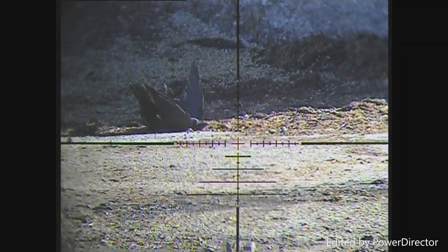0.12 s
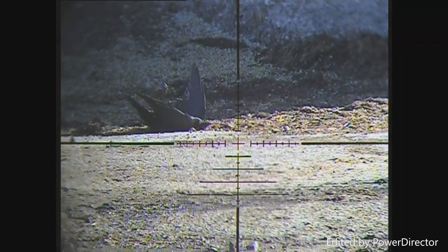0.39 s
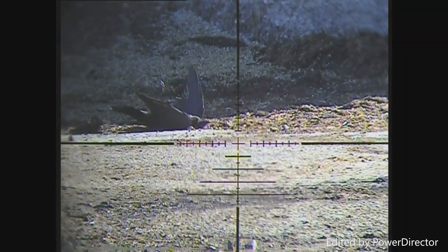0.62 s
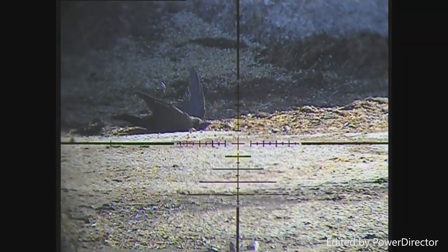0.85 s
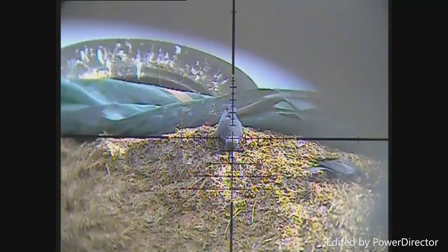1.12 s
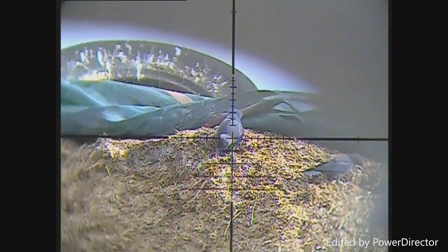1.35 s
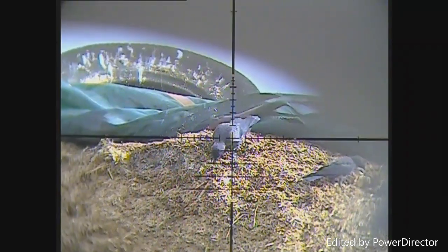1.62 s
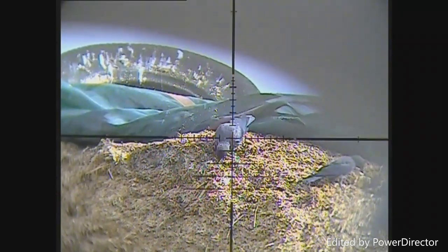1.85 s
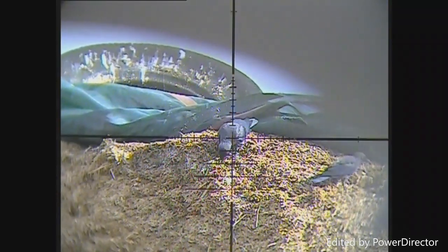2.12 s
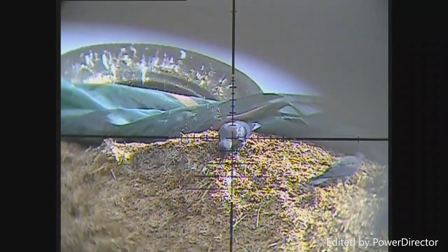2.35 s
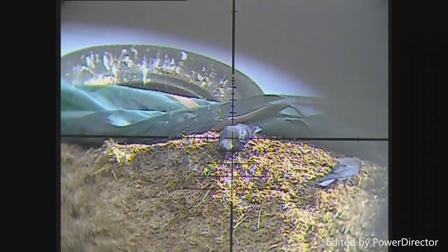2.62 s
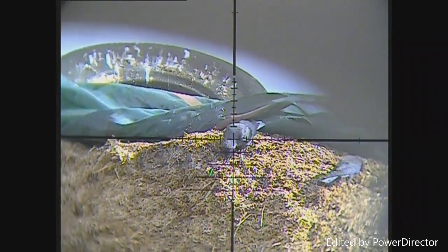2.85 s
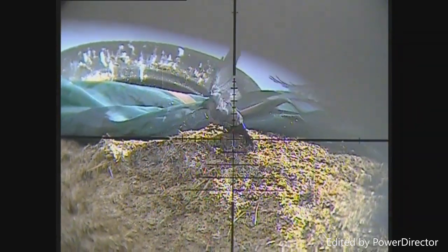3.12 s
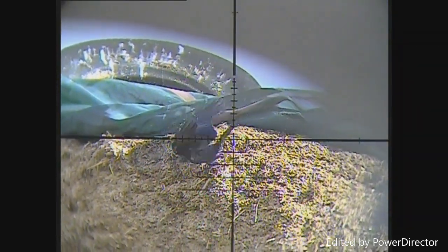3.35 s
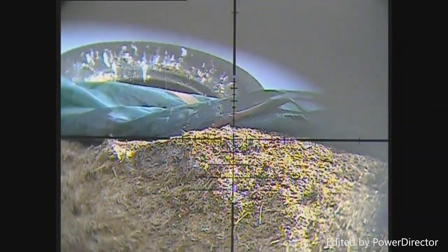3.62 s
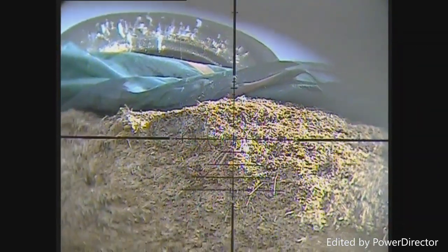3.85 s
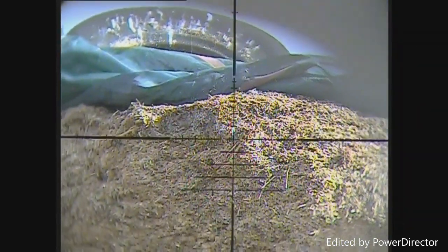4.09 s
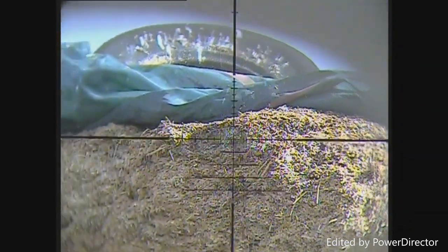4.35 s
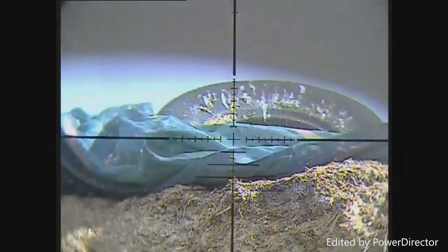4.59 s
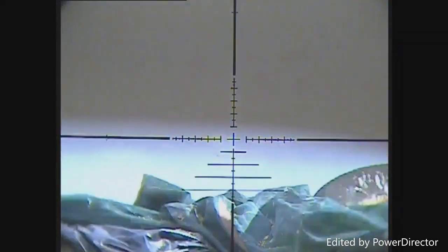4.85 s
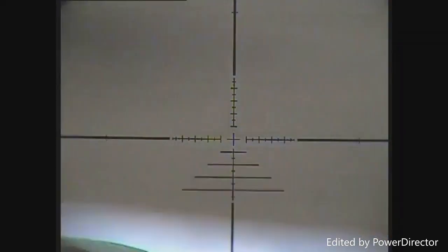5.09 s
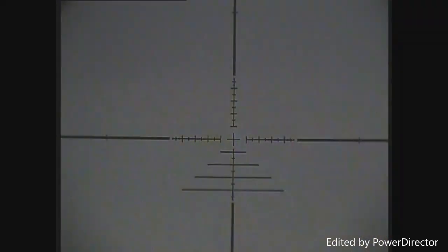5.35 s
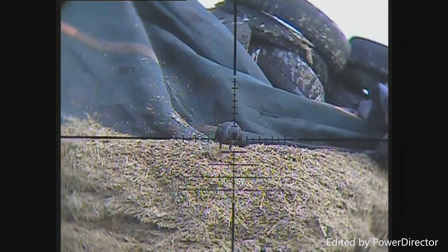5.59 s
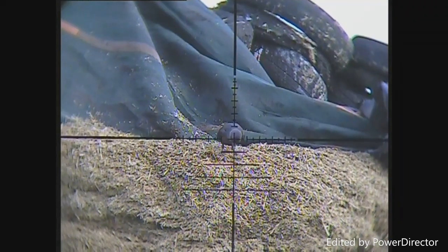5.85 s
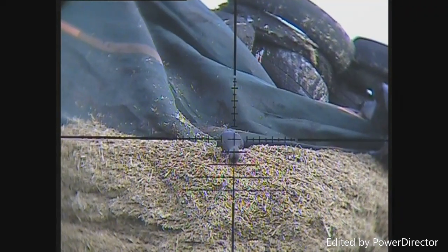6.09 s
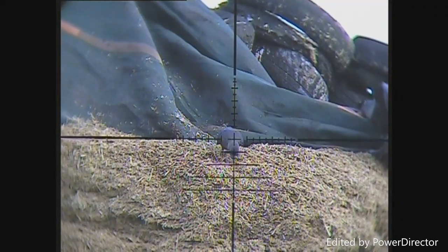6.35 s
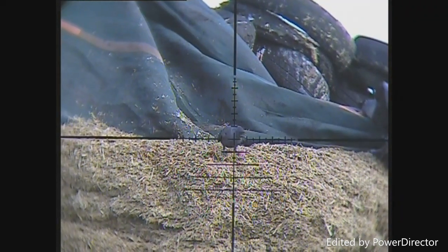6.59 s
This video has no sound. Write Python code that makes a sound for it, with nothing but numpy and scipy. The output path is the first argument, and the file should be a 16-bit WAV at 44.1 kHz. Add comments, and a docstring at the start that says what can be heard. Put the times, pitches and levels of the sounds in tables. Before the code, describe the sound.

Outdoors on a farm, a small camera microphone on an air rifle hears a distant vehicle's low rumble and rising engine tones, with thin sparrow chirps and a button click. After a silent gap, quiet hiss leads to one clipped, cracking shot with metallic ringing and a short yard echo. Bolt knocks and cloth rustle follow, then another click, silence, a brief rattle and quiet hiss.

```python
"""An air rifle with a small camera on its scope, outdoors on a farm, heard in three stretches with silence between.
First a vehicle passes far off, made of coloured noise and gliding tones; a sparrow chirps and a button rings its case.
Then one shot overloads the input: struck modes ring in rifle and air cylinder, a throbbing air column and a noise
crack sound, and the yard echoes in bands of dying noise. The rifle is cocked and shifted with knocks and cloth rustle,
and the button clicks again. Last, after a short rattle, only the quiet yard and the hiss of the circuit remain."""
import sys
import numpy as np
from scipy import signal
from scipy.fft import rfft, irfft, next_fast_len
from scipy.io import wavfile

SR = 44100
rng = np.random.default_rng(int(sys.argv[2]) if len(sys.argv) > 2 else 0)


def ratio(d):
    """dB to gain"""
    e = np.asarray(d, float) / 20
    return 10 ** e


def wav_record(signal):
    """Record a signal, one row per channel, as 16-bit PCM in the file named by sys.argv[1]."""
    frames = np.transpose(np.atleast_2d(signal))
    bounded = np.clip(frames, -1, 1)
    # unit amplitude maps onto the largest positive 16-bit level
    quanta = np.round(bounded * 32767).astype(np.int16)
    wavfile.write(sys.argv[1], SR, quanta)


N = 295911

# Stretches in which the input is live. Each row: start in seconds, stop in seconds.
LIVE_SPANS = [(0, .8350), (1.1184, 5.0850), (5.6184, 6.8)]

# Passing vehicle. Each row: time in seconds, rumble level in dB, tyre roar level in dB.
TRAFFIC = [(0, -38, -61), (.1, -46, -60), (.2, -42.5, -60.5), (.33, -46.5, -59), (.59, -37, -56),
           (.76, -46, -57)]
# Colour of its low rumble. Each row: frequency in Hz, relative density in dB per Hz.
RUMBLE_COLOUR = [(12, -26.5), (20, 3), (68, -1.5), (198, -17), (274, -22), (312, -28.5), (450, -30),
                 (580, -59.5), (990, -120)]
# Colour of its tyre roar. Each row: frequency in Hz, relative density in dB per Hz.
ROAR_COLOUR = [(180, -35), (300, -5), (458, -8), (504, -10.5), (553, -17.5), (760, -4), (1520, -21),
               (2000, -20.5), (3470, -36.5), (4600, -41.5), (5000, -35), (6500, -61), (11000, -120)]
# Rising engine tones. Each row: start in seconds, stop in seconds, first pitch in Hz, last pitch in Hz,
# level at the middle in dB.
ENGINE_HOWLS = [(0, .29, 239.5, 298.4, -56.5), (0.398, 0.591, 314.6, 369, -56), (.58, 0.758, 394, 416, -62)]
# The loudest engine tone as a curve. Each row: time in seconds, pitch in Hz, level in dB.
LOUD_HOWL = [(.42, 216, -61), (.544, 241.5, -57.5), (.66, 273, -44), (.77, 297, -48.5), (.835, 285, -50.5)]
ROAR_HZ, ROAR_SAG_FROM_S, ROAR_SAG_HZ_PER_S = 2110, .2, 380   # the roar's resonance sinks as it passes
DRONE_HZ, DRONE_DB = 498, -68.5
SWELL_DB = 4.5   # a gliding tone is this much weaker at its ends

# Low wind. Each row: time in seconds, level in dB.
GUSTS = [(1.12, -66), (2.0, -66.5), (2.8, -64.5), (3.4, -59.5), (3.9, -62), (4.4, -63), (4.7, -59.5),
         (5.08, -64), (5.62, -68), (6.7, -67)]
# Colour of the wind. Each row: frequency in Hz, relative density in dB per Hz.
WIND_COLOUR = [(8.8, -26), (15, 6), (27, -12.5), (80, -10), (103, -17.5), (235, -22), (262, -23),
               (507, -32), (1200, -43), (1560, -72), (2640, -120)]
# Cloth rustles as the rifle is shifted. Each row: start in seconds, stop in seconds, level in dB.
MOVES = [(3.692, 3.823, -74.5), (4.06, 4.248, -72), (4.544, 5.13, -73)]
# Colour of the cloth. Each row: frequency in Hz, relative density in dB per Hz.
RUSTLE_COLOUR = [(180, -31), (300, -3), (502, 3), (565, -10.5), (725, -8.5), (1460, -18.5), (1980, -11.5),
                 (3480, -21.5), (7000, -24), (9100, -57.5), (15400, -120)]
MOVE_FADE_S, STILL_DB = 0.047, -84
HUM_HZ, HUM_DB = 75.4, -75

# Colour of the hiss shared by both channels. Each row: frequency in Hz, relative density in dB per Hz.
SHARED_HISS_COLOUR = [(350, -33), (600, -2.5), (979, -7.5), (7320, -12.5), (7620, -8), (8050, -3),
                      (8380, -7), (8970, -6.5), (12300, -11.5), (13500, -7.5), (15400, -14.5)]
# Colour of the hiss with opposite sign in the two channels. Each row: frequency in Hz, relative density in dB per Hz.
OPPOSED_HISS_COLOUR = [(12, -26.5), (20, -5.5), (26, -12.5), (33, -41.5), (70, -45.5), (98, -32.5),
                       (119, -49.5), (238, -51.5), (630, -53), (11100, -59), (15400, -69)]
SHARED_HISS_DB, OPPOSED_HISS_DB = -77, -67.5   # rms
# Whine of the camera electronics. Each row: frequency in Hz, level in dB rms.
WHINE = [(7865, -82), (9001, -94.5), (13028, -102), (14002, -100)]
# Constant input offset. Each row: one channel's offset (left, then right) as a share of full scale.
OFFSET = [
    [-.0068],
    [.0059],
]
SETTLE, SETTLE_S = 0.0039, 0.045   # microphone bias as a share of full scale, and its decay time
CUTOFF_HZ = 15800   # stopband edge of the input's top cut

# Sparrow notes. Each row: start in seconds, stop in seconds, first pitch in Hz, last pitch in Hz,
# level at the middle in dB.
CHIRPS = [(0.495, .53, 4630, 4730, -66), (0.516, 0.54, 4680, 5250, -66.5), (0.534, .572, 4720, 4650, -78.5),
          (0.579, .597, 3770, 4320, -67), (.608, 0.629, 4660, 5330, -73), (0.81, .828, 4150, 5150, -75),
          (0.82, .842, 4850, 4980, -69.5)]

# Presses of the camera's stop button. Each row: time in seconds, peak level in dB.
PRESSES = [(0.791, -28.5), (5.05, -30)]
# Modes of the camera case. Each row: frequency in Hz, level in dB, t60 in seconds.
CASE_MODES = [(200, -15.5, 0.068), (530, -10.5, 0.08), (760, -3.5, 0.03), (980, -6.5, 0.034),
              (1720, -9.5, 0.018), (2340, -3, 0.0025), (3030, -12.5, 0.017), (3860, -19, 0.007),
              (5000, -16.5, 0.0062), (6700, -16.5, .015), (9500, -23.5, .006)]
# Rattles of the button letting go. Each row: time in seconds, level in dB rms, t60 in seconds.
RELEASES = [(1.1188, -62.5, 0.05), (5.064, -66.5, 0.11), (5.076, -74, 0.053), (5.6184, -52, 0.057)]
# Colour of that rattle. Each row: frequency in Hz, relative density in dB per Hz.
RATTLE_COLOUR = [(710, -42), (1200, -15), (2440, -4.5), (2730, -10), (3220, 0.5), (4710, -13), (8730, -5),
                 (10400, -15), (14000, -14)]

SHOT_S = 2.8258
# Modes of the rifle's action. Each row: frequency in Hz, level in dB, t60 in seconds.
ACTION_MODES = [(412.1, -13.5, 0.026), (535, -7, 0.029), (696, -0.5, .025), (843, -6, 0.025),
                (1129, -16.5, 0.011), (1420, -21, .015), (1670, -19, 0.065), (2080, -25, 0.028),
                (3180, -25.5, .012), (3790, -24, 0.025), (4400, -25, 0.013), (5800, -27, .01),
                (8500, -30, .008)]
# Modes of the stock. Each row: frequency in Hz, level in dB, t60 in seconds.
STOCK_MODES = [(61.7, -10.5, 0.072), (111, -7, 0.15), (163, -3, 0.082), (225, 1.5, 0.15), (296, -7, .06),
               (357, -9, 0.045)]
# The trigger lets go. Its one row: time in seconds, peak level in dB, contact in ms, share into the stock in dB.
SEAR = (2.8208, -26, .5, -8)
# The hammer chatters on the open valve: gap, first touch, loss per touch, contact, share into the stock.
CHATTER_S, HAMMER_DB, CHATTER_LOSS_DB, HAMMER_MS, HAMMER_STOCK_DB = .0037, -3.5, 1.5, 0.051, -13.5
# The hammer falls back. Each row: time in seconds, peak level in dB, contact in ms.
BOUNCES = [(2.8478, -8.5, .06), (2.8643, -5, .17), (2.8946, -12.5, .17), (2.9030, -19, .16),
           (2.9100, -21.5, .14)]
BOUNCE_STOCK_DB = -25
# Bolt and handling knocks. Each row: time in seconds, peak level in dB, contact in ms, share into the stock in dB,
# change at each rebound in dB.
KNOCKS = [(3.699, -56.5, .05, -0.5, -1.5), (3.834, -52, 0.27, -3.5, -14), (3.8839, -35.5, .09, -17, -8),
          (3.896, -37.5, 0.011, -2, -20), (3.9, -27, .1, -15.5, -5), (3.977, -32, .28, -3, -1),
          (4.227, -54.5, 0.11, -2, 3.5), (4.305, -56, 0.14, -1.5, -3.5), (4.491, -46.5, 0.17, -10.5, -5),
          (4.512, -53, 0.19, -6, 1), (4.531, -41, 0.12, -17, -4), (4.649, -52, 0.27, 2.5, -9),
          (4.684, -55, 0.47, 4, -6), (4.711, -60, 0.44, 3, -3), (4.979, -59.5, 0.39, 5, -10)]
# Two rebounds follow each knock: gap, growth of the contact each time, share by which the gap varies.
REBOUND_S, REBOUND_SOFTER, REBOUND_UNEVEN = .006, 1.46, .25

# Modes of the air cylinder. Each row: frequency in Hz, level in dB, t60 in seconds.
CYLINDER_MODES = [(617, -21, .18), (799.5, -5, 0.083), (1017, -12.5, 0.084), (1116, -6.5, 0.018),
                  (1520, -11, 0.028), (2283, -13, .14), (2400, -22, 0.057)]
# Its long note falls fast, then slowly. Each row: frequency in Hz, level in dB, t60 in seconds.
PING = [(874, -20, .43), (874, -35.5, 2.1)]
# Barrel air column: pitch, height, time the valve is open, fall after it shuts.
BARREL_HZ, BARREL_DB, VALVE_OPEN_S, BARREL_T60_S = 614, 6, .0092, .008
# Colour of the muzzle crack. Each row: frequency in Hz, relative density in dB per Hz.
BLAST_COLOUR = [(710, -34.5), (1200, -3.5), (2350, -12), (3210, -17.5), (3530, -15.5), (9050, -21.5),
                (15400, -38.5)]
BLAST_DB, BLAST_RISE_S, BLAST_T60_S = -6.5, .0008, 0.033
# Colour of the yard's echoes. Each row: frequency in Hz, relative density in dB per Hz.
YARD_COLOUR = [(40, -14), (100, -7), (230, -8.5), (420, -7.5), (700, -7), (1000, -10.5), (1400, -13.5),
               (2200, -5.5), (3300, -13.5), (4700, -10), (5800, -16), (6900, -12.5), (8500, -19.5),
               (11000, -25), (15300, -32)]
# How long the echoes last. Each row: frequency in Hz, t60 in seconds.
YARD_T60 = [(60, 1.5), (150, .9), (400, .8), (1000, .6), (1500, 0.72), (2200, 0.73), (3300, .55),
            (4700, .6), (7000, 0.4), (10000, .4), (14000, 0.27)]
# Far walls swell the echoes again. Each row: delay in seconds, level in dB.
LATE_ECHOES = [(.06, -8), (0.094, -9.5), (.125, -24), (.17, -29), (.215, -12), (.29, -7)]
YARD_DB = -31.5   # echoes at the moment of the shot


def rms_one(x):
    """Scale to rms 1."""
    return x / np.sqrt(np.mean(x ** 2) + 1e-20)


def in_time(rows):
    """Columns of a curve at every sample."""
    s, *columns = np.transpose(rows)
    return [np.interp(np.arange(N) / SR, s, c) for c in columns]


def at_hz(points, hz):
    """Read a spectrum on a log frequency axis."""
    return np.interp(np.log(hz), np.log(np.array(points)[:, 0]), np.array(points)[:, 1])


def since(s):
    """Time since an event (zero before it), and whether it has begun."""
    t = np.arange(N) / SR - s
    return np.maximum(t, 0), t >= 0


def drift(rate):
    """Slow chance: straight lines between random knots of spread 1, rate knots per second."""
    knots = rng.standard_normal(int(N / SR * 60) + 9)
    return np.interp(np.arange(N) / SR * np.clip(rate, .1, 59), np.arange(len(knots)), knots)


def noise(colour, length=N):
    """Noise of the given colour, rms 1."""
    size = next_fast_len(length)
    hz = np.maximum(np.arange(size // 2 + 1) * SR / size, 1)
    spectrum = rfft(rng.standard_normal(size)) * ratio(at_hz(colour, hz))
    return rms_one(irfft(spectrum, size)[:length])


def ring(force, hz, t60):
    """A two-pole resonator: a unit click sets a decaying sine of height 1 ringing."""
    r, w = ratio(-60 / (t60 * SR)), 2 * np.pi * hz / SR
    return signal.lfilter([0, np.sin(w)], [1, -2 * r * np.cos(w), r * r], force + 1e-18)


def struck(modes, times, levels_db, contacts_ms, spread_db):
    """Each blow is a rounded push; a longer contact is duller; strengths vary by mode and blow."""
    chance = rng.standard_normal((len(times), len(modes)))
    t, out = np.arange(400) / SR, np.zeros(N)
    for k, (hz, mode_db, t60) in enumerate(modes):
        force = np.zeros(N)
        for s, level_db, ms, luck in zip(times, levels_db, contacts_ms, chance[:, k]):
            push = t * np.exp(-t / (max(ms, .01) / 1000))
            height = ratio(level_db + mode_db + spread_db * luck)
            force[round(s * SR):][:len(t)] += push / push.sum() * height
        out += ring(force, hz, t60) * (-1) ** k   # neighbouring modes swing in opposite senses
    return out


def glide(start, stop, from_hz, to_hz, db):
    """Curve of a tone that slides evenly and swells in the middle."""
    middle = ((start + stop) / 2, (from_hz + to_hz) / 2, db)
    return [(start, from_hz, db - SWELL_DB), middle, (stop, to_hz, db - SWELL_DB)]


def tone(rows, waver, waver_db, rate):
    """A wavering sine along a pitch and level curve, faded at its ends."""
    hz, level_db = in_time(rows)
    t = np.arange(N) / SR
    fade = np.clip(np.minimum(t - rows[0][0], rows[-1][0] - t) / 0.013, 0, 1)
    phase = 2 * np.pi * np.cumsum(hz * (1 + waver * drift(rate))) / SR
    return np.sqrt(2) * fade * ratio(level_db + waver_db * drift(rate)) * np.sin(phase)


def tyre_resonance():
    """Two slow noises on a sine and cosine carrier make a narrow band whose centre sinks."""
    peak_hz = ROAR_HZ - ROAR_SAG_HZ_PER_S * np.clip(np.arange(N) / SR - ROAR_SAG_FROM_S, 0, 1)
    low_pass = signal.butter(2, 55.0, fs=SR, output="sos")
    slow = signal.sosfilt(low_pass, rng.standard_normal((2, N)), axis=1)
    phase = 2 * np.pi * np.cumsum(peak_hz) / SR
    return rms_one(slow[0] * np.cos(phase) + slow[1] * np.sin(phase))


def vehicle():
    """Lumpy rumble, tyre roar with a sinking resonance, a steady drone and gliding engine tones."""
    rumble_db, roar_db = in_time(TRAFFIC)
    rumble = ratio(rumble_db + 1.5 * drift(7.3)) * noise(RUMBLE_COLOUR)
    roar = ratio(roar_db + 1.1 * drift(20)) * (noise(ROAR_COLOUR) + ratio(-12.5) * tyre_resonance())
    curves = [glide(*row) for row in ENGINE_HOWLS]
    curves += [LOUD_HOWL, glide(*LIVE_SPANS[0], DRONE_HZ, DRONE_HZ, DRONE_DB)]
    engine = sum(tone(rows, waver=.008, waver_db=2.2, rate=25) for rows in curves)
    return (rumble + roar + engine) * (np.arange(N) < SR)   # gone by the second stretch


def wind():
    """Low noise whose level follows the gusts."""
    wind_db, = in_time(GUSTS)
    return ratio(wind_db + 1.2 * drift(8.7)) * noise(WIND_COLOUR)


def far_hum():
    """A low sine wavering in pitch and level."""
    return tone([(0, HUM_HZ, HUM_DB), (N / SR, HUM_HZ, HUM_DB)], waver=.03, waver_db=4.0, rate=8)


def cloth_rustle():
    """Flickering noise, faint when still, that fades in and out with each move."""
    t = np.arange(N) / SR
    height = ratio(STILL_DB)
    for start, stop, db in MOVES:
        height = height + ratio(db) * np.clip(np.minimum(t - start, stop - t) / MOVE_FADE_S, 0, 1)
    return height * ratio(2.2 * drift(22)) * noise(RUSTLE_COLOUR)


def circuit_hiss():
    """One hiss common to both channels, and one with opposite sign in left and right."""
    shared = ratio(SHARED_HISS_DB + 0.53 * drift(1.7)) * noise(SHARED_HISS_COLOUR)
    opposed = ratio(OPPOSED_HISS_DB) * noise(OPPOSED_HISS_COLOUR) * [[1], [-1]]
    return shared + opposed


def electronics_whine():
    """Steady high sines whose levels drift slightly."""
    t = np.arange(N) / SR
    return sum(np.sqrt(2) * ratio(db + 1.2 * drift(30)) * np.sin(2 * np.pi * hz * t) for hz, db in WHINE)


def sparrow():
    """Short sines that slide in pitch and waver quickly."""
    return sum(tone(glide(*row), waver=.012, waver_db=2.2, rate=55) for row in CHIRPS)


def button():
    """The case rings at each press and a burst of dying noise rattles at each release."""
    s, level_db = np.transpose(PRESSES)
    out = struck(CASE_MODES, s, level_db, [.03, .03], spread_db=-1.5)
    out += struck(CASE_MODES, s + .0045, level_db - 18, [.25, .25], spread_db=9.0)   # the switch bottoms out
    rattle = noise(RATTLE_COLOUR)
    for s, level_db, t60 in RELEASES:
        t, on = since(s)
        out += on * ratio(level_db - 60 * t / t60) * rattle
    return out


def blows():
    """Every touch on the rifle as (s, peak dB, contact ms, share into the stock dB)."""
    rows = [SEAR]
    for k in range(4):
        rows.append((SHOT_S + k * CHATTER_S, HAMMER_DB - k * CHATTER_LOSS_DB, HAMMER_MS, HAMMER_STOCK_DB))
    rows += [(*row, BOUNCE_STOCK_DB) for row in BOUNCES]
    for s, db, ms, stock_db, change_db in KNOCKS:
        gap = REBOUND_S * (1 + REBOUND_UNEVEN * rng.uniform(-1, 1))
        rows += [(s + k * gap, db + k * change_db, ms * REBOUND_SOFTER ** k, stock_db) for k in range(3)]
    return rows


def rifle():
    """The modes of action and stock ring at every blow."""
    s, level_db, ms, stock_db = np.transpose(blows())
    action = struck(ACTION_MODES, s, level_db, ms, spread_db=5.0)
    return action + struck(STOCK_MODES, s, level_db + stock_db, ms, spread_db=0.0)


def cylinder():
    """The air cylinder rings as the valve opens and shuts, with a long note from the opening."""
    kick = np.arange(N) == round(SHOT_S * SR)
    long_note = sum(ratio(db) * ring(kick, hz, t60) for hz, db, t60 in PING)
    return long_note + struck(CYLINDER_MODES, [SHOT_S, SHOT_S + 0.0095], [0, -5], [.02, .05], spread_db=-1.2)


def barrel():
    """The driven air column throbs lopsidedly until the valve shuts, then dies fast."""
    t, on = since(SHOT_S)
    height = ratio(BARREL_DB - 60 * np.maximum(t - VALVE_OPEN_S, 0) / BARREL_T60_S)
    phase = 2 * np.pi * BARREL_HZ * t
    return on * height * (np.sin(phase) - .55 * np.sin(1.93 * phase))   # an overtone just under the octave


def blast():
    """A short bright crack of escaping air: noise with a quick rise and an exponential fall."""
    t, _ = since(SHOT_S)
    return np.minimum(t / BLAST_RISE_S, 1) * ratio(BLAST_DB - 60 * t / BLAST_T60_S) * noise(BLAST_COLOUR)


def yard_echoes():
    """Echoes of the shot die band by band and swell again from far walls."""
    out, start = np.zeros(N), round(SHOT_S * SR)
    edges = 50 * 2 ** np.arange(-.4, 8.5, .4)   # Hz
    t = np.arange(SR) / SR
    swell = 1 + sum(ratio(db) * np.exp(-((t - lag) / 0.014) ** 2) for lag, db in LATE_ECHOES)
    coloured = noise(YARD_COLOUR, SR), noise(YARD_COLOUR, SR)   # neighbouring bands get unrelated noise
    for k, (low, high) in enumerate(zip(edges, edges[1:])):
        band_pass = signal.butter(2, [low, high], "band", fs=SR, output="sos")
        band = signal.sosfilt(band_pass, coloured[k % 2])
        fall = ratio(-60 * t / at_hz(YARD_T60, np.sqrt(low * high)))
        uneven = ratio(2.2 * drift(40)[:SR])   # uneven surfaces
        out[start:start + SR] += ratio(YARD_DB) * band * fall * swell * uneven
    return out


def scene():
    """Everything reaches one microphone, which feeds both channels."""
    air = wind() + far_hum() + cloth_rustle()
    shot = rifle() + cylinder() + barrel() + blast() + yard_echoes()
    mono = vehicle() + air + sparrow() + button() + shot
    return np.array([mono, mono])


def band_limit(x):
    """A steep low-pass at the top of the band."""
    return signal.sosfilt(signal.butter(12, 15600, fs=SR, output="sos"), x)


def record(dry):
    """Circuit noise and offsets join, peaks clip hard, the input is live only in its spans and the top is cut."""
    t = np.arange(N) / SR
    live = sum((t >= start) & (t < stop) for start, stop in LIVE_SPANS)
    settle = 0   # the bias settles as the second and third stretches begin
    for start, _ in LIVE_SPANS[1:]:
        age, on = since(start)
        settle = settle + SETTLE * on * np.exp(-age / SETTLE_S)
    wired = dry + circuit_hiss() + electronics_whine() + settle + OFFSET
    wired = np.clip(wired, -1, 1) * live
    top_cut = signal.cheby2(12, 65, CUTOFF_HZ, fs=SR, output="sos")
    mix = signal.sosfilt(top_cut, wired)
    return band_limit(mix)


dry = scene()
out = record(dry)
wav_record(out)
```